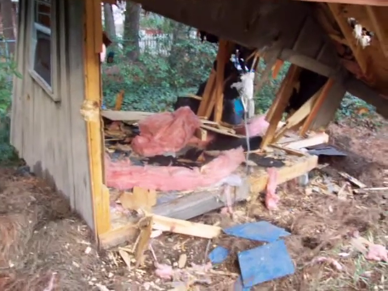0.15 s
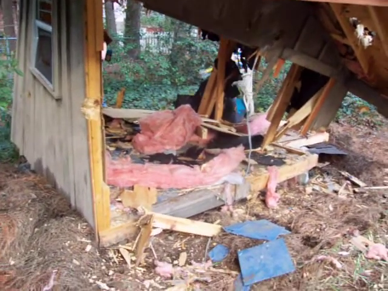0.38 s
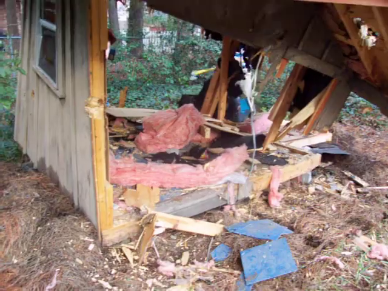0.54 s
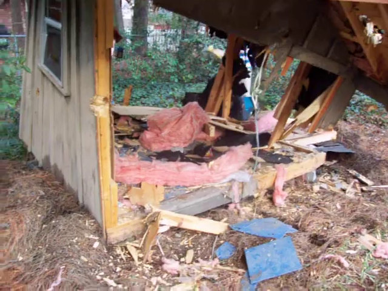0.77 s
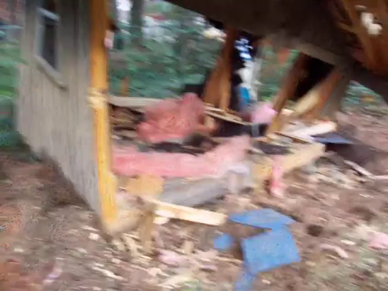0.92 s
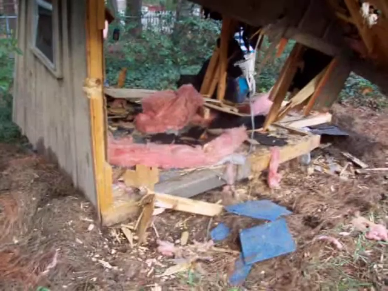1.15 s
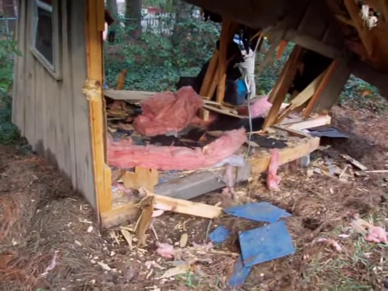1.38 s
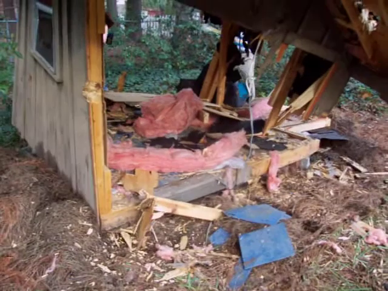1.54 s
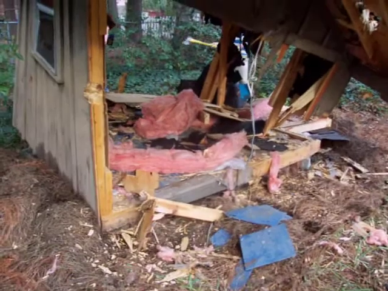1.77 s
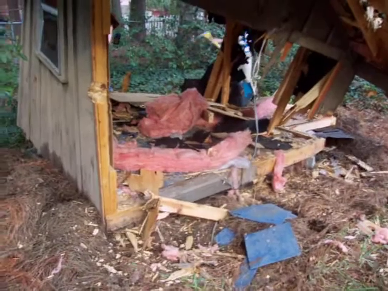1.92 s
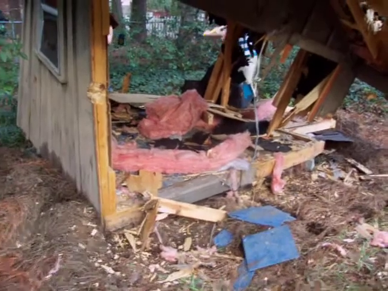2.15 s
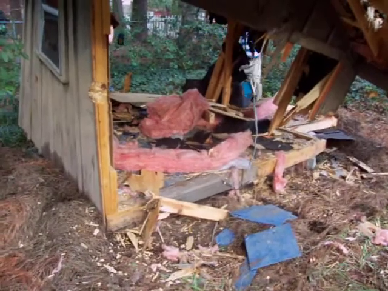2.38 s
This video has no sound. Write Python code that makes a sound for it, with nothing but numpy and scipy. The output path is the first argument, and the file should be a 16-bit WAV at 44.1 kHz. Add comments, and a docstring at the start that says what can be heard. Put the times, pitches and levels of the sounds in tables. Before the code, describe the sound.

A heavy tool whacks a half-wrecked wooden shed twice, about a second apart, clipping the narrow-band microphone; loose pieces thud and snap between, echoes fade among trees, and a thin electronic whine sits faintly behind.

```python
"""Two heavy blows on the timber frame of a half-wrecked shed, close enough to overload the microphone.
Each is a low push, ringing timber modes and grainy crack noise, then a long noise wash from the trees.
Loose pieces land as knocks of a few dying modes; splinter snaps, ticks and one faint narrow chirp
are short bursts of band-shaped noise.
Behind them lie quiet outdoor air, made of coloured noise, and a thin, chopped electronic whine."""
import sys
import numpy as np
from scipy import signal
from scipy.fft import rfft, irfft
from scipy.io import wavfile
from scipy.ndimage import uniform_filter1d

SR = 44100
rng = np.random.default_rng(int(sys.argv[2]) if len(sys.argv) > 2 else 0)


def inscribe(sig):
    """Save sig as 16-bit PCM at rate SR to the path in sys.argv[1].

    A 1-D sig is mono; a 2-D sig holds one channel per row.
    Samples are clipped to [-1, 1] before scaling.
    """
    pcm = np.round(np.clip(np.atleast_2d(sig).T, -1, 1) * 32767)
    wavfile.write(sys.argv[1], SR, pcm.astype(np.int16))


N = 105840  # samples, 2.4 s

# colour of cracking wood, shared by crack, graze and rebound: (frequency [Hz], relative level [dB])
CRACK_COLOUR = [(20, -28), (60, -4.5), (200, 2.5), (560, -5.5), (900, -3.5), (1350, -11.5), (1900, -6.5),
                (2800, -3.5), (3300, -10.5), (3850, -4), (4800, -13), (6000, -7), (7000, -8.5),
                (8200, -21.5), (12000, -58)]


def amp(db):
    """Decibels to gain."""
    return 10 ** (np.asarray(db) / 20)


def evened(x):
    """Scales to rms 1."""
    return x / np.sqrt(np.mean(x ** 2) + 1e-20)


def read(points, hz):
    """Reads a table of (frequency, value) along a log-frequency axis."""
    f, value = np.transpose(points)
    return np.interp(np.log(hz + 1), np.log(f + 1), value)


def add(mix, s, sound):
    """Mixes a sound in at a time in seconds."""
    part = mix[max(round(s * SR), 0):][:len(sound)]
    part += sound[:len(part)]


def noise(colour):
    """Noise of rms 1 with the given colour."""
    spectrum = rfft(rng.standard_normal(N))
    gain = amp(read(colour, np.fft.rfftfreq(N, 1 / SR)))
    return evened(irfft(spectrum * gain, N))


def fade(x, t60=None, hold=0, patchy_db=0, size=256):
    """Makes noise patchy; given decay times, each band dies at its own speed after a hold."""
    overlap = size * 3 // 4
    hz, t, bands = signal.stft(x, SR, nperseg=size, noverlap=overlap)
    # random level changes, smoothed across frequency and then time
    patches = uniform_filter1d(rng.standard_normal(bands.shape), size=8, axis=0)
    patches = uniform_filter1d(patches, size=8, axis=1)
    db = patchy_db * evened(patches)
    if t60:
        db = db - 60 * np.maximum(t - hold, 0) / read(t60, hz)[:, None]
    return signal.istft(bands * amp(db), SR, nperseg=size, noverlap=overlap)[1][:N]


def decay(t, t60):
    """Exponential decay that falls 60 dB in t60 seconds."""
    return np.exp(-np.log(1000) * t / t60)


def ring(t, hz, t60):
    """One dying mode: a sine under an exponential decay."""
    return decay(t, t60) * np.sin(2 * np.pi * hz * t)


def rise(t, length):
    """A straight attack from 0 to 1."""
    return np.clip(t / length, 0, 1)


def lowpass(x, hz, size=255):
    """Steep band limit."""
    taps = signal.firwin(size, hz, window=("kaiser", 9), fs=SR)
    return signal.oaconvolve(x, taps, "same")


def blow(pitch, body_db, crack_db, favoured_hz, lift_db):
    """The tool shoves the beam once, splinters the wood and rings the timber; the spot favours one range."""
    # modes of the struck timber: (frequency before the pitch ratio [Hz], relative level [dB], t60 [s])
    timber_modes = [(117, -7, 0.039), (206, -7.5, .07), (284.6, -9, 0.088), (364, -5.5, 0.081),
                    (433.6, -7, 0.039), (776, -2.5, 0.081), (845, -10.5, 0.15), (932, -3.5, 0.093),
                    (1019.4, -2, 0.074), (1120, -9, 0.09), (1910, -7, 0.038), (2796, -3.5, 0.045),
                    (3848, -10.5, 0.04), (4150, -11.5, 0.033)]
    # how fast the crack dies: (frequency [Hz], t60 [s])
    crack_t60 = [(100, 0.036), (900, 0.062), (2500, 0.032), (7000, 0.029)]
    body_top_hz, favour_oct = 700, 0.2
    push_db, push_s, push_delay_s = 3, 0.00618, 0.00065
    timber_rise_s = 0.0022
    crack_base_db, crack_rise_s, crack_hold_s = -0.5, 0.0035, 0.0071
    grain_db, grain_s = 3.5, 0.00085  # rms depth and smoothing time of the crack's roughness
    t = np.arange(N) / SR

    def spot(hz):
        """Level change in dB that the struck spot gives to a frequency."""
        octaves = np.log2(hz / favoured_hz)
        return body_db * (hz < body_top_hz) + lift_db * np.exp(-(octaves / favour_oct) ** 2)

    # a single sine cycle
    push = amp(push_db) * np.sin(2 * np.pi * rise(t - push_delay_s, push_s))

    modes = np.zeros(N)
    for k, (hz, db, t60) in enumerate(timber_modes):
        polarity = (-1) ** k
        modes += polarity * amp(db + spot(hz)) * ring(t, hz * pitch, t60)

    roughness = uniform_filter1d(rng.standard_normal(N), max(round(grain_s * SR), 1))
    grain = amp(grain_db * evened(roughness))
    colour = [(hz, db + spot(hz)) for hz, db in CRACK_COLOUR]
    fibres = fade(noise(colour), crack_t60, crack_hold_s)
    crack = amp(crack_base_db + crack_db) * rise(t, crack_rise_s) * grain * fibres
    return rise(t, timber_rise_s) * modes + crack - push


def echo(near_db, echo_db, length):
    """Scatter from the wreck and the ground, then a swelling wash from the trees and a low boom."""
    # colours of the scatter and of the trees: (frequency [Hz], relative level [dB])
    near_colour = [(30, -10), (100, -13), (300, -14), (650, -13.5), (800, -10.5), (950, 1.5), (1080, -18),
                   (1370, -21.5), (1900, -17), (2500, -20), (3200, -24), (6900, -29.5), (8200, -52),
                   (9000, -68)]
    woods_colour = [(18, -35), (30, -6.5), (48, 0), (76, -11), (135, -1.5), (263, -27), (334, -11.5),
                    (404, -25.5), (579, -9.5), (668, -11.5), (789, -3), (955, 1.5), (1370, -13.5),
                    (2150, -8.5), (2360, -8.5), (3000, -16.5), (6290, -26), (7990, -43.5), (9000, -54.5),
                    (11700, -90), (19800, -120)]
    # decay of the scatter, and of the trees before the length ratio: (frequency [Hz], t60 [s])
    near_t60 = [(100, 0.91), (900, 0.64), (5000, 0.73)]
    woods_t60 = [(50, .6), (150, 0.73), (450, 1.34), (900, 1.58), (2000, 1.085), (4000, 1.36), (7500, 1.3)]
    near_base_db, near_rise_s = -19.5, 0.013
    woods_db, woods_start_s, woods_rise_s = -20, 0.054, 0.049
    woods_hold_s, woods_patchy_db = 0.14, 1.5
    boom_db, boom_hz, boom_delay_s, boom_width_s = -27.5, 45.9, 0.125, 0.042
    t = np.arange(N) / SR

    scatter = fade(noise(near_colour), near_t60)
    scatter = amp(near_base_db + near_db) * rise(t, near_rise_s) * scatter

    stretched_t60 = [(hz, t60 * length) for hz, t60 in woods_t60]
    woods = fade(noise(woods_colour), stretched_t60, woods_hold_s, patchy_db=woods_patchy_db)
    woods = amp(woods_db) * rise(t - woods_start_s, woods_rise_s) * woods

    swell = np.exp(-((t - boom_delay_s) / boom_width_s) ** 2)
    boom = amp(boom_db) * swell * np.sin(2 * np.pi * boom_hz * t)
    return scatter + amp(echo_db) * (woods + boom)


def hammering():
    """Each blow with its first graze, a clack as the beam rebounds, its reflections and its echo."""
    # the two blows: (time [s], level [dB], timber pitch ratio, low body change [dB], crack change [dB],
    # favoured frequency [Hz], its lift [dB], rebound delay [s], rebound level [dB],
    # scatter change [dB], tree echo change [dB], echo length ratio)
    blows = [(.2186, -2.5, 1.0, -5.5, -2, 1870, 7, 0.015, -17, 2.5, -0.5, 0.97),
             (1.3284, -4.5, 0.98, 1, 0, 3960, 5.5, .018, -12.5, 2.5, 0, 1.077)]
    # single reflections from walls and trunks: (delay [s], level [dB])
    reflections = [(.091, -26.5), (.135, -24.5)]
    graze_db, graze_lead_s = -22.5, 0.0034
    rebound_t60 = 0.021  # s
    out, t = np.zeros(N), np.arange(N) / SR
    for (s, db, pitch, body_db, crack_db, favoured_hz, lift_db,
         rebound_s, rebound_db, near_db, echo_db, length) in blows:
        hit = amp(db) * blow(pitch, body_db, crack_db, favoured_hz, lift_db)
        graze_shape = rise(t, graze_lead_s) * (t < 2 * graze_lead_s)
        graze = amp(graze_db) * graze_shape * noise(CRACK_COLOUR)
        rebound = amp(rebound_db) * decay(t, rebound_t60) * noise(CRACK_COLOUR)
        add(out, s - graze_lead_s, graze)
        add(out, s, hit)
        add(out, s + rebound_s, rebound)
        for delay, bounce_db in reflections:
            add(out, s + delay, amp(bounce_db) * hit)
        add(out, s, echo(near_db, echo_db, length))
    return out


def tiny_burst(hz, t60, width, size=4096):
    """A tiny noise burst around one pitch, on a quieter skirt one octave wide."""
    skirt_db = -11.5
    t, f = np.arange(size) / SR, np.fft.rfftfreq(size, 1 / SR)
    octaves = np.log2((f + 1) / hz)
    colour = np.exp(-(octaves / width) ** 2) + amp(skirt_db) * np.exp(-octaves ** 2)
    burst = evened(irfft(rfft(rng.standard_normal(size)) * colour))
    return burst * decay(t, t60)


def debris():
    """Knocks of falling pieces as dying modes, splinter snaps, one faint chirp and faint random ticks."""
    # falling pieces: (time [s], level [dB], pitch [Hz], t60 [s], overtone change [dB])
    knocks = [(0.6297, -1, 211, 0.033, -2), (.856, -21, 895, .06, -19), (1.04, -24, 250, 0.039, 1)]
    # modes of every piece: (pitch ratio, relative level [dB])
    knock_modes = [(1, 3), (1.85, -2.5), (2.6, -13.5), (3.8, -9.5)]
    # splinter snaps, and one faint narrow chirp at 1.951 s:
    # (time [s], relative level [dB], centre [Hz], t60 [s], width [octaves])
    bursts = [(.1366, -28, 6000, 0.013, 0.81), (.189, -27.5, 6260, 0.016, .3),
              (.5755, -26, 6000, .02, 0.26), (0.6284, -11.5, 6140, 0.0043, 0.32),
              (0.6288, -19, 4700, 0.028, 0.39), (0.8053, -29, 3100, .045, 0.18),
              (0.804, -25, 5350, .03, 0.74), (0.9088, -16, 2620, 0.011, 0.16),
              (.9087, -21.5, 5000, 0.0075, 0.72), (.9405, -28, 3950, 0.013, .6),
              (.9865, -31, 4930, 0.019, 1), (1.142, -24, 6150, 0.0098, 0.66),
              (1.193, -31, 4970, 0.013, 0.59), (1.9019, -19.5, 5800, 0.015, 0.13),
              (1.951, -33.5, 2950, 0.044, 0.063), (1.994, -35, 5800, 0.016, .3),
              (2.2774, -29, 5850, 0.023, 0.59), (2.32, -29.5, 4400, 0.015, 1),
              (2.351, -33, 6800, .02, 0.23), (2.3714, -24.5, 5940, 0.01, 0.39)]
    knock_rise_s = 0.0062
    bursts_db = -3.5  # applied to every burst
    ticks_per_s, ticks_db = 60, -52
    out, t = np.zeros(N), np.arange(SR // 4) / SR

    for s, db, hz, t60, overtones_db in knocks:
        body = np.zeros(len(t))
        for k, (ratio, mode_db) in enumerate(knock_modes):
            body += amp(mode_db + overtones_db * (k > 0)) * ring(t, hz * ratio, t60)
        add(out, s, amp(db) * rise(t, knock_rise_s) * body)

    for s, db, hz, t60, width in bursts:
        add(out, s, amp(db + bursts_db) * tiny_burst(hz, t60, width))

    clicks = (rng.random(N) < ticks_per_s / SR) * rng.uniform(.2, 1, N)
    ticks = signal.oaconvolve(clicks, tiny_burst(hz=6150, t60=0.006, width=0.99))[:N]
    return out + amp(ticks_db) * evened(ticks)


def air():
    """Steady outdoor background of coloured noise, slightly uneven, with a faint narrow hiss."""
    # colours of the air and of the hiss above it: (frequency [Hz], relative level [dB])
    air_colour = [(12, -43), (20, -13), (38, -5), (59, -4.5), (90, -3), (145, -9), (190, -7.5),
                  (312, -10.5), (344, -9.5), (380, -7.5), (409, -7.5), (487, -7.5), (524, -9.5), (579, -9),
                  (639, -9.5), (818, -4.5), (1130, -12.5), (1310, -22), (1850, -22.5), (3700, -30.5),
                  (7400, -26), (9620, -36), (16300, -120)]
    hiss_colour = [(5000, -38.5), (6150, -10), (6330, -4.5), (6500, -21), (7500, -41)]
    air_db, air_patchy_db, hiss_db = -38, 2, -58
    outdoors = amp(air_db) * fade(noise(air_colour), patchy_db=air_patchy_db)
    return outdoors + amp(hiss_db) * noise(hiss_colour)


def whine():
    """A thin electronic tone and its mirror image; steady restarts chop it into a faint buzz."""
    tone_hz, mirror_hz, restart_hz = 7859.6, 8000, 29.97
    tone_db, image_db = -47.5, -2.5  # image relative to the tone
    slip_rad = 1  # phase jump halfway through each cycle
    t = np.arange(N) / SR
    cycle = (t * restart_hz + .32) % 1
    phase = 2 * np.pi * tone_hz * cycle / restart_hz + slip_rad * (cycle > .5)
    # reflected about mirror_hz
    image = np.sin(2 * np.pi * 2 * mirror_hz * t - phase)
    return amp(tone_db) * (np.sin(phase) + amp(image_db) * image)


def scene():
    """Everything at the microphone."""
    return (hammering() + debris() + air() + whine())[None]


def record(dry):
    """The input sheds deep bass, overloads on the blows, is narrowed in band, and clips once more."""
    low_cut_hz, band_hz, edge_hz = 24, 8330, 16100
    overload, ceiling = 0.82, 0.79  # clipping levels, full scale = 1
    high_pass = signal.butter(2, low_cut_hz, "high", fs=SR, output="sos")
    lean = signal.sosfilt(high_pass, dry[0])
    overloaded = np.clip(lean, -overload, overload)
    narrow = lowpass(overloaded, band_hz, size=151)
    return lowpass(np.clip(narrow, -ceiling, ceiling), edge_hz)[None]


dry = scene()
out = record(dry)
inscribe(out)
```